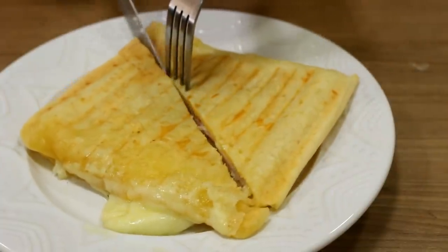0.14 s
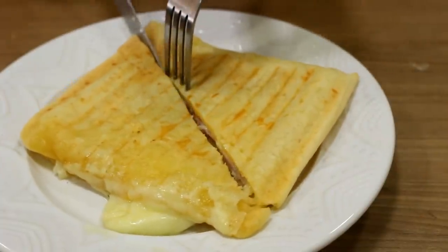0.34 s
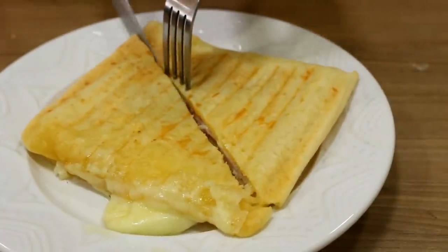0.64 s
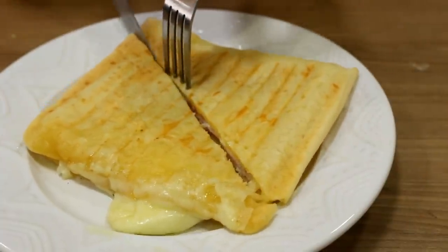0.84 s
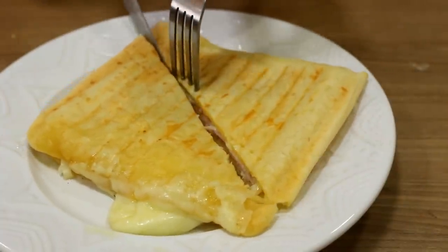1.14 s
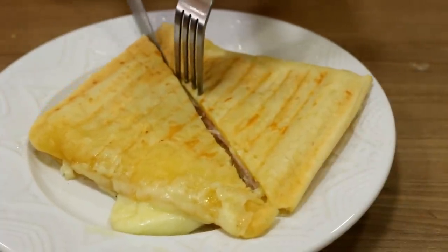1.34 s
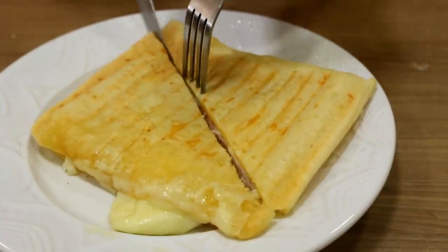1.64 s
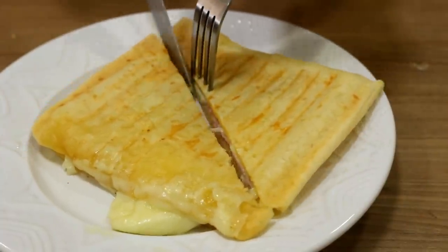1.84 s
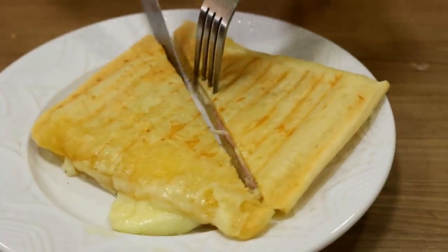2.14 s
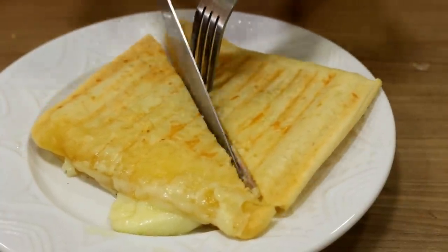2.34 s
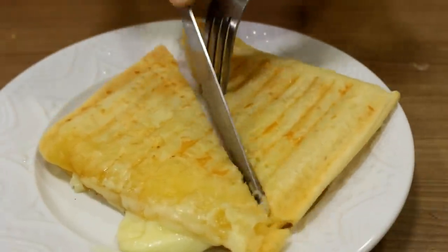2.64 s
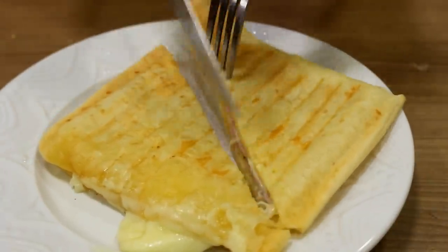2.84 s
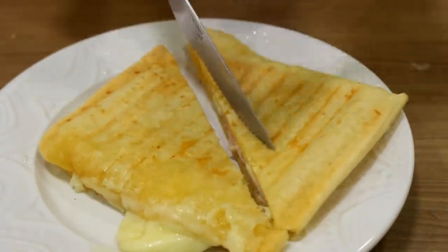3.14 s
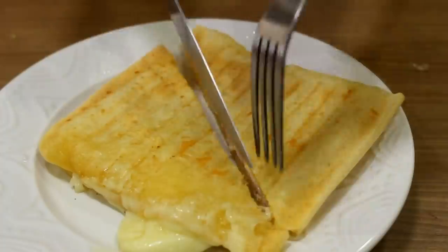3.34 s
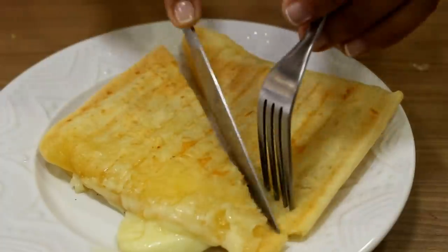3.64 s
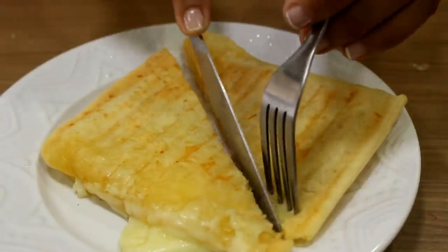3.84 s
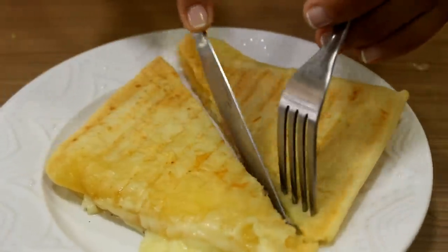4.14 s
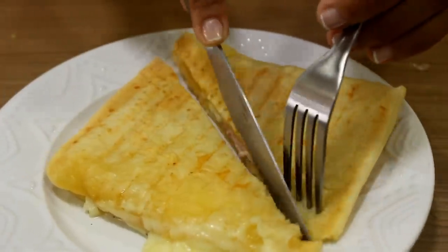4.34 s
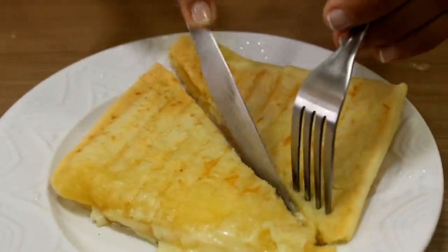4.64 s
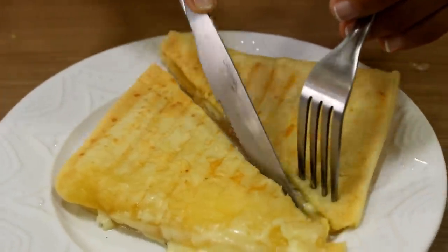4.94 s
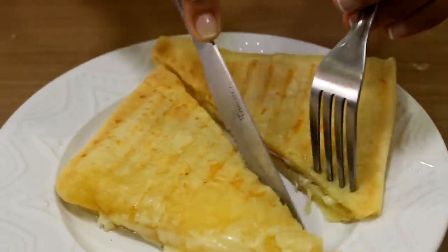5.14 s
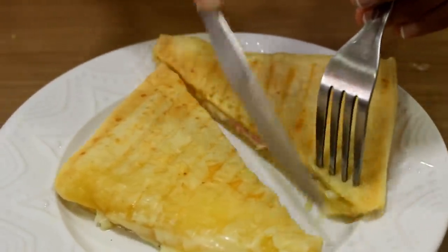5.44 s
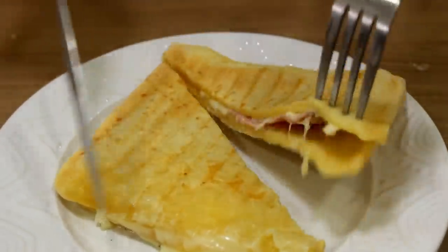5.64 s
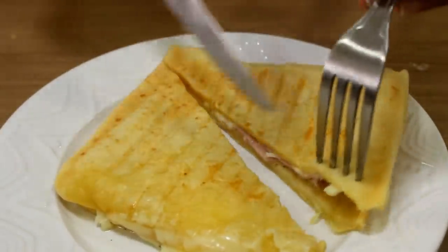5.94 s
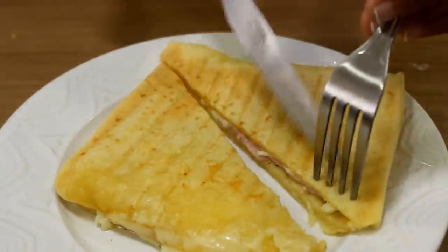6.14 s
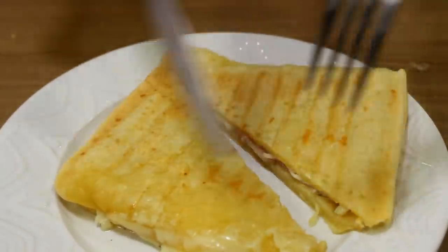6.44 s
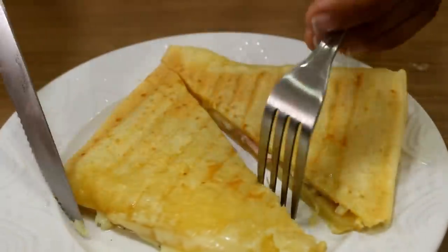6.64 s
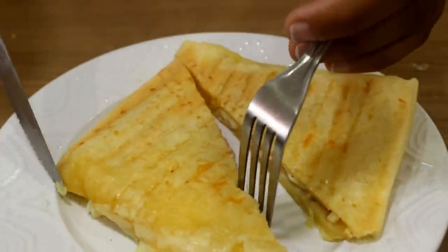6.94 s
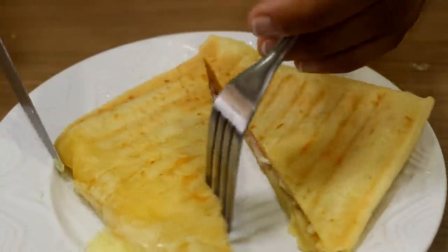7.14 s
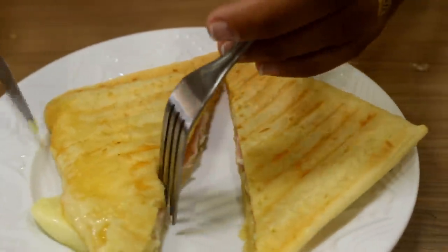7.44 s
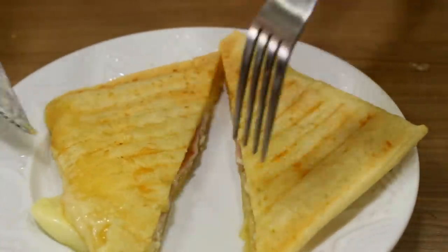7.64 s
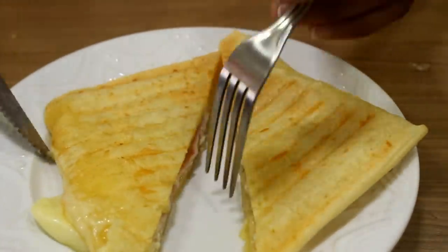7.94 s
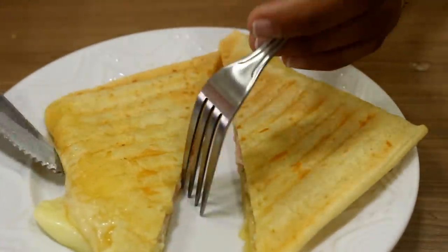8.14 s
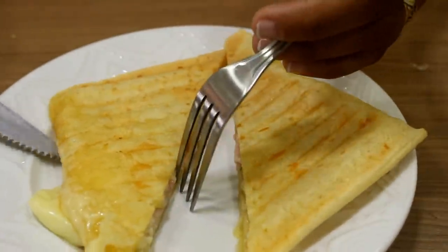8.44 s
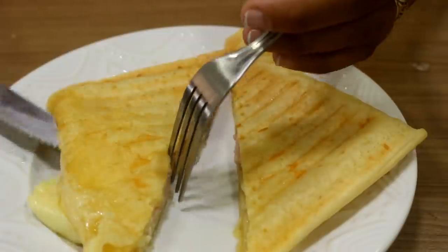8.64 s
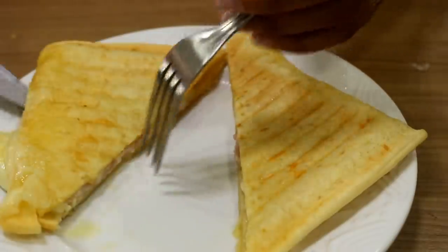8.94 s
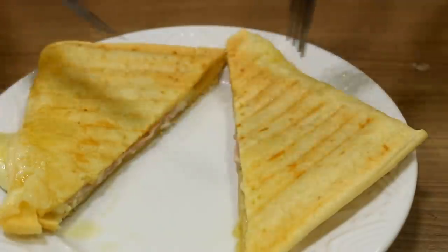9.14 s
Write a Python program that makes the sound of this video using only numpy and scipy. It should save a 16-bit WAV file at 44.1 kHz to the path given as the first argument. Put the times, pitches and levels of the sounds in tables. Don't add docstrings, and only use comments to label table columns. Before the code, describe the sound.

A serrated knife saws a toasted sandwich on a ceramic plate, clattering hard early, then thinning to rasps, fork clinks and one brief squeal.

```python
import sys
import numpy as np
from scipy import signal
from scipy.fft import rfft, irfft, next_fast_len
from scipy.io import wavfile
from scipy.ndimage import uniform_filter1d

SR = 44100
rng = np.random.default_rng(int(sys.argv[2]) if len(sys.argv) > 2 else 0)


def ratio_of_db(decibels):
    return 10 ** (np.asarray(decibels, float) / 20)


def unload_wav(signal):
    wavfile.write(
        sys.argv[1],
        SR,
        np.round(np.clip(np.atleast_2d(signal).T, -1, 1) * 32767).astype(np.int16),
    )


N = 409248
TIME = np.arange(N) / SR

# (time [s], peak level [dB], blade pitch [Hz], plate ring [dB])
FIRST_CATCHES = [(.0014, -33.5, 2330, -11), (.0084, -28.5, 3200, -21.5), (.0171, -34.5, 2000, -18),
                 (.0534, -30, 3430, -20), (.2631, -12.5, 3170, -31), (.2717, -16, 2040, -17),
                 (.4958, -13.5, 3200, -19), (.528, -14, 3220, -27.5), (.5477, -2, 3240, -20.5),
                 (.558, -8, 2449, -22.5), (.5698, -13, 3190, -10.5), (.7087, -4.5, 3160, -32),
                 (.7137, -2, 3090, -10), (.7218, -9, 3200, -22.5), (.7262, -5, 3320, -26),
                 (.7329, -12.5, 3300, -5.5), (.7401, -11.5, 3220, -6.5), (.75, -17, 3240, -15),
                 (.8005, -10, 3260, -20.5), (.8155, -9, 3310, -19), (.8265, -4.5, 3234, -17),
                 (.9855, -25, 3400, -12), (1.0565, -33.5, 3230, -1.5), (1.2232, -25.5, 3170, -13.5)]
# (time [s], peak level [dB], blade pitch [Hz], plate ring [dB], brightness [dB])
MIDDLE_CATCHES = [(1.4568, -17.5, 3410, -19.5, -6.), (1.4745, -22.5, 3230, -27, 2.5),
                  (1.491, -23.5, 3200, -12, -0.5), (1.5042, -24, 3270, -10.5, -0.5),
                  (1.5177, -26, 3580, -24, 13), (1.5639, -11, 3216, -14, -2.5),
                  (1.7907, -16.5, 3400, -12, 4), (1.8236, -26.5, 2610, -16.5, 4),
                  (2.0649, -14, 2450, -5.5, 11), (2.0757, -12, 3410, -11, 2.5),
                  (2.0924, -21.5, 3210, -13.5, 15), (2.137, -15, 3340, -16, -2.5),
                  (2.1657, -16.5, 3200, -20.5, -5.5), (2.1724, -25.5, 1960, -8, 8),
                  (2.5214, -39.5, 3630, -26, 5), (2.5557, -24, 1970, -18, 1.5)]
LAST_CATCHES = [(3.8648, -40, 2000, -25.5, -5), (3.933, -34.5, 2620, -24, -1),
                (3.9594, -48.5, 3130, -3, -2.), (4.0051, -38.5, 2370, -13, 1), (4.333, -38, 1890, -25, -5),
                (4.3548, -32.5, 2250, -25, -8), (4.3775, -33.5, 2030, -18, 2), (4.3855, -31.5, 3200, -7, 5),
                (4.41, -26.5, 3200, -14, -8), (4.4479, -33, 3330, -17, 6.5), (4.4868, -30.5, 3000, -7, 5),
                (4.6458, -28.5, 1880, -1, 12), (4.9279, -28, 1930, -11, 9.), (5.1969, -31, 1950, -9, 10.),
                (5.8745, -53.5, 1968, -9.5, -5), (6.736, -22, 3034, -0.5, 13),
                (8.9865, -49.5, 2036, -4, -13)]
CATCH_CRACK_DB = [-39, -17.5, -14]
# (time [s], peak level [dB], click pitch [Hz],
# ring [dB], brightness [dB])
CUTLERY_HITS = [
    (.289, -19, 3190, -19, -2.5),
    (1.3118, -28, 4220, -8.5, 1),
    (2.8696, -12, 3743, -10.5, 1.5),
    (4.5288, -14, 3500, -14, 7.),
    (4.7284, -13, 3520, -21, 7),
    (6.758, -10.5, 3630, -17.5, -5),
    (8.2428, -19.5, 3760, -5.5, -9),
]
# (pitch [Hz], level [dB], t60 [s]); the plate's list ends with a low table mode
# near 155 Hz that rings along with it
PLATE_MODES = [(813.3, -15.5, .12), (1972, -7.5, 0.12), (2540, -11.5, 0.082), (3170, -6.5, 0.2),
               (4536, -13.5, 0.37), (4558, -15.5, 0.33), (6141, -21, 0.11), (7825, -22.5, 0.18),
               (7860, -24, .05), (9900, -24.5, 0.12), (10670, -26, .06), (12410, -33, .05),
               (12990, -25.5, .04), (155.3, -27.5, 0.25)]
CUTLERY_MODES = [(1588, -13, 0.021), (2122, -15.5, 0.023), (2400, -16, .02), (3520, -2, .02), (3680, -8, .14),
                 (4080, 2, 0.011), (5870, -11.5, 0.018), (5810, -5, .015), (7340, -5, 0.027),
                 (9880, -9.5, 0.039), (10900, -16, 0.03), (13000, -14, .02)]
BLADE_MODES = [(1250, -10.5, 0.024), (2620, -5.5, 0.023), (3660, -4.5, 0.019), (4600, -9, 0.015),
               (5900, -7.5, 0.031), (7150, -12.5, 0.019), (8520, -13.5, 0.029), (10120, -4, .035),
               (11620, -16, .025), (13690, -9.5, 0.024), (15780, -9, 0.016)]
# (fullest at [s], length [s], rasp [dB], table rumble [dB])
STROKES = [(0., .3, -38.5, -43), (0.337, 0.41, -45, -56.5), (0.581, 0.23, -50.5, -64),
           (0.78, 0.23, -30, -51), (1.037, 0.27, -46.5, -57), (1.29, 0.45, -51.5, -56),
           (1.68, .3, -49, -67), (1.875, .3, -46.5, -46.5), (2.17, 0.48, -43.5, -58),
           (2.435, 0.23, -56, -74), (2.596, 0.16, -38, -47.5), (2.975, 0.53, -55.5, -62.5),
           (3.74, 0.37, -62.5, -64), (3.948, 0.19, -46.5, -74), (4.17, 0.23, -43, -55.5),
           (4.516, 0.18, -38, -58), (4.729, 0.36, -43.5, -52.5), (5.22, 0.45, -49.5, -51),
           (6.883, .12, -42.5, -71), (7.108, 1, -57.5, -71.5), (7.442, 0.36, -52.5, -47.5),
           (8.586, 0.158, -65, -71), (8.943, 0.29, -67, -61.5)]
# (frequency [Hz], level [dB])
RASP_TONE = [(180, -37.5), (300, -6), (895, -8.5), (986, -0.5), (1620, -11.5), (2030, -9.5), (2720, -10.5),
             (3690, -9.5), (4700, -20), (14000, -37)]
# (time [s], peak level [dB], centre [Hz])
CRUMB_SNAPS = [(3.0318, -27.5, 9600), (3.032, -32, 2450), (3.1098, -39, 1400), (3.1383, -40, 6530),
               (3.1794, -45, 11000), (3.5545, -52, 2910), (4.0896, -42, 1140), (4.1993, -42, 3590),
               (4.6633, -28, 1590), (5.2374, -36.5, 1490), (5.3518, -39, 4470), (5.436, -48, 3100),
               (5.4935, -48, 4550), (5.6033, -59, 1348), (5.624, -52.5, 3180), (5.7714, -54, 1090),
               (6.0861, -46.5, 2512), (6.1995, -49.5, 1440), (6.32, -46.5, 3570), (6.3827, -46.5, 2300),
               (6.4063, -48, 2840), (6.5121, -51.5, 3460), (6.5123, -47.5, 1390), (7.1706, -41, 3150),
               (7.3188, -38, 2830), (7.4604, -43.5, 1985), (8.8287, -44, 4130)]
# (fullest at [s], length [s], level [dB], centre [Hz])
SLIDES = [
    (2.453, 0.22, -51, 3100),
    (3.157, 0.12, -51, 9300),
    (4.16, .2, -53, 2306),
    (4.438, 0.11, -47, 3270),
    (6.781, .12, -54, 11000),
    (8.911, 0.074, -57, 1010),
    (4.591, .2, -44, 3800),
    (4.791, .2, -46, 3600),
]
# (time [s], slip rate [Hz], level [dB])
SQUEAL_PATH = [
    (6.764, 803, -40),
    (6.791, 861, -31.5),
    (6.832, 824, -45),
    (6.886, 884, -41.5),
    (6.955, 734.4, -40.5),
    (6.986, 782, -38),
    (7.03, 743.5, -43.5),
    (7.08, 789, -59),
    (7.22, 760, -60),
]
SQUEAL_PARTIALS_DB = [-10, -5, -1.5, -7, -8, -26, -27, -18]
# (hardest at [s], length [s], level [dB])
PUSHES = [(0., .2, -51), (0.276, 0.33, -59.5), (.57, 0.16, -50.5), (0.84, 0.13, -46.5), (1.333, 0.42, -62),
          (1.54, 0.18, -48.5), (1.922, 0.43, -55), (2.172, 0.36, -51), (2.997, 0.65, -70.5),
          (4.065, 0.6, -66.5), (4.74, 0.41, -60), (5.003, 0.14, -56.5), (5.27, 0.16, -63.5)]
# (band centre [Hz], level [dB], t60 [s])
ROOM_BANDS = [
    (244.9, -15, 0.53),
    (944, -15, 0.61),
    (3200, -18, 0.67),
    (7900, -10.5, 0.61),
    (11000, -30, 0.4),
]
# (frequency [Hz], level [dB])
HISS_TONE = [(12, -25), (20, 0.5), (32, -33), (75, -21), (105, -21.5), (257, -20.5), (321, -24), (369, -26),
             (413, -21.5), (532, -28), (2860, -33.5), (13800, -38.5), (16300, -39)]
SIDE_HISS_TONE = [(12, -27.5), (20, -2), (43, 0.5), (99, -0.5), (595, -6.5), (684, -10.5), (6820, -12),
                  (15000, -8.5), (16300, -17.5)]


def fft_filter(x, response):
    size = next_fast_len(N + len(response))
    return irfft(rfft(x, size) * rfft(response, size), size)[:N]


def colour(x, points):
    hz, db = np.transpose(points)
    bins = np.maximum(np.arange(len(x) // 2 + 1) * SR / len(x), 1)
    gain = ratio_of_db(np.interp(np.log(bins), np.log(hz), db))
    y = irfft(rfft(x) * gain, len(x))
    return y / np.std(y)


def band(x, lo_hz, hi_hz):
    sos = signal.butter(2, [lo_hz, hi_hz], "bandpass", fs=SR, output="sos")
    return signal.sosfilt(sos, x)


def fade(length_s, t60):
    return np.exp(-np.log(1000) * np.arange(int(length_s * SR)) / SR / t60)


def add(track, s, sound):
    start = int(s * SR)
    track[start:start + len(sound)] += sound[:N - start]


def walk(rate):
    hold = int(SR / rate)
    levels = np.repeat(rng.standard_normal(N // hold + 1), hold)
    return uniform_filter1d(levels, hold)[:N]


def swells(s, length_s, db):
    power, steps = 0, TIME[::64]
    for at, length, top in zip(s, length_s, db):
        power = power + ratio_of_db(top) ** 2 * np.exp(-(4 * (steps - at) / length) ** 2)
    return np.interp(TIME, steps, np.sqrt(power))


def ring(times, strength_db, modes, scatter_db):
    out = np.zeros(N)
    where = (np.asarray(times) * SR).astype(int)
    for hz, db, t60 in modes:
        share_db = scatter_db * rng.standard_normal(len(where))
        sign = np.sign(rng.standard_normal(len(where)))
        blows = np.zeros(N)
        blows[where] = ratio_of_db(strength_db + db + share_db) * sign
        pole = np.exp(2j * np.pi * hz / SR - np.log(1000) / (t60 * SR))
        out += signal.lfilter([0, pole.imag], [1, -2 * pole.real, abs(pole) ** 2], blows)
    return out


def click(hz, t60):
    t = np.arange(int(.06 * SR)) / SR
    main = np.sin(2 * np.pi * hz * t)
    lower = ratio_of_db(-6.5) * np.sin(2 * np.pi * .76 * hz * t)
    twin = ratio_of_db(-4.5) * np.sin(2 * np.pi * 0.99 * hz * t)
    onset = np.minimum(t / 0.00046, 1)
    y = (main + lower + twin) * fade(.06, t60) * onset
    return y / np.max(np.abs(y))


def hits(table, modes, click_t60, crack_db, thump_db, clatter_db, scatter_db):
    out = np.zeros(N)
    for s, db, hz, _, *bright in table:
        bright_db = sum(bright)
        grit = rng.standard_normal((3, int(.06 * SR)))
        crack = band(grit[0] * fade(.06, .014), 5000, 9300)
        thump = band(grit[1] * fade(.06, 0.076), 200, 1300)
        clatter = band(grit[2] * fade(.06, 0.03), 0.39 * hz, 1.17 * hz)
        body = click(hz, click_t60)
        body = body + ratio_of_db(crack_db + bright_db - 0.1 * db) * crack / crack.max()
        body = body + ratio_of_db(thump_db - 0.22 * db) * thump / thump.max()
        body = body + ratio_of_db(clatter_db - bright_db) * clatter / clatter.max()
        add(out, s, ratio_of_db(db) * body)
    rows = np.array(table)
    return out + ring(rows[:, 0], rows[:, 1] + rows[:, 3], modes, scatter_db)


def knife_catches():
    tooth_t60 = .019
    first_db, middle_db, last_db = CATCH_CRACK_DB
    first = hits(FIRST_CATCHES, PLATE_MODES, tooth_t60, crack_db=first_db,
                 thump_db=-20, clatter_db=-8.5, scatter_db=2.5)
    middle = hits(MIDDLE_CATCHES, PLATE_MODES, tooth_t60, crack_db=middle_db,
                  thump_db=-17, clatter_db=-14, scatter_db=3.0)
    last = hits(LAST_CATCHES, PLATE_MODES, tooth_t60, crack_db=last_db,
                thump_db=-11.5, clatter_db=-14, scatter_db=5.0)
    return first + middle + last


def sawing():
    s, length_s, rasp_db, rumble_db = np.transpose(STROKES)
    bursts_db = 2.2 * rng.exponential(size=N) * (rng.random(N) < .05)
    grains = rng.standard_normal(N) * ratio_of_db(bursts_db + 2.8 * walk(60))
    rasp = colour(grains, RASP_TONE)
    plate = fft_filter(rasp, ring([0], 0, PLATE_MODES, scatter_db=0)[:SR // 2])
    crust = rasp + ratio_of_db(-9) * plate / plate.std()
    rumble = band(rng.standard_normal(N), 170, 520) * ratio_of_db(0.58 * walk(22))
    return (swells(s, length_s, rasp_db - 4.5) * crust
            + swells(s, length_s, rumble_db - 5.5) * rumble / rumble.std())


def cutlery_taps():
    return hits(CUTLERY_HITS, CUTLERY_MODES, click_t60=0.015, crack_db=-13,
                thump_db=-24, clatter_db=-5.0, scatter_db=1.5)


def squeal():
    s, hz, db = np.transpose(SQUEAL_PATH)
    slip_hz = np.interp(TIME, s, hz) * (1 + .022 * walk(220))
    phase = 2 * np.pi * np.cumsum(slip_hz) / SR
    stack = np.zeros(N)
    for number, partial_db in enumerate(SQUEAL_PARTIALS_DB, 1):
        stack += ratio_of_db(partial_db + 4.5 * walk(70)) * np.sin(number * phase)
    one_mode = ring([0], 0, PLATE_MODES[3:4], scatter_db=0)[:SR // 2]
    plate = fft_filter(rng.standard_normal(N), one_mode)
    level = ratio_of_db(np.interp(TIME, s, db, left=-120, right=-120))
    return (stack + ratio_of_db(1.5) * plate / plate.std()) * level


def blade_clink():
    return ring([8.6135], -32 - 3.5, BLADE_MODES, scatter_db=-1.0)


def sliding():
    grains = rng.standard_normal(N) * ratio_of_db(1.5 * rng.exponential(size=N) + 3.2 * walk(110))
    out = np.zeros(N)
    for s, length_s, db, hz in SLIDES:
        rub = band(band(grains, .6 * hz, 1.45 * hz), .6 * hz, 1.45 * hz)
        out += swells([s], [length_s], [db]) * rub / rub.std()
    return out


def crumbs():
    out = np.zeros(N)
    for s, db, hz in CRUMB_SNAPS:
        burst = rng.standard_normal(int(.03 * SR)) * fade(.03, 0.024)
        snap = band(burst, .72 * hz, 1.3 * hz)
        add(out, s, ratio_of_db(db) * snap / np.abs(snap).max())
    return out


def pressing():
    low = band(rng.standard_normal(N), 45, 87.7)
    resting = ratio_of_db(-76.5)
    return (swells(*np.transpose(PUSHES)) + resting) * low / low.std()


def kitchen(dry):
    tail = 0
    for hz, db, t60 in ROOM_BANDS:
        echoes = band(rng.standard_normal(int(1.2 * SR)), hz / 2, hz * 1.526) * fade(1.2, t60)
        tail = tail + ratio_of_db(db) * echoes / np.sqrt(np.sum(echoes ** 2))
    tail = tail * np.minimum(np.arange(len(tail)) / SR / 0.02, 1)
    return dry + fft_filter(dry, tail)


def hiss(tone, db):
    return ratio_of_db(db) * colour(rng.standard_normal(N), tone)


def scene():
    steel = knife_catches() + cutlery_taps() + squeal() + blade_clink()
    crust = sawing() + sliding() + crumbs()
    mid = kitchen(steel + crust) + pressing() + hiss(HISS_TONE, -62.5)
    side = hiss(SIDE_HISS_TONE, -68.5)
    return np.array([mid + side, mid - side])


def band_limit(x):
    return signal.sosfilt(signal.butter(12, 16420, fs=SR, output="sos"), x)


def record(dry):
    mix = np.clip(dry, -1, 1)
    return band_limit(mix)


dry = scene()
out = record(dry)
unload_wav(out)
```